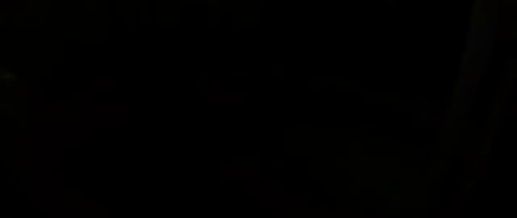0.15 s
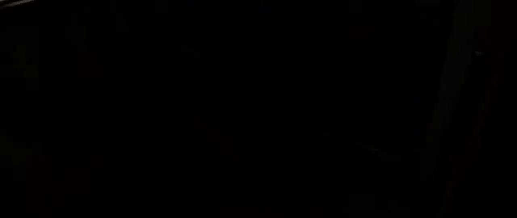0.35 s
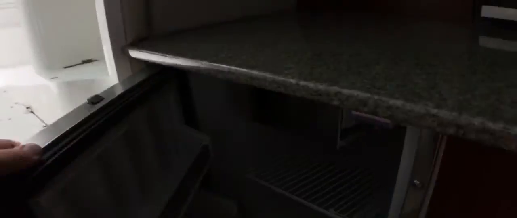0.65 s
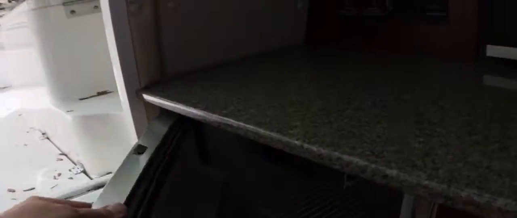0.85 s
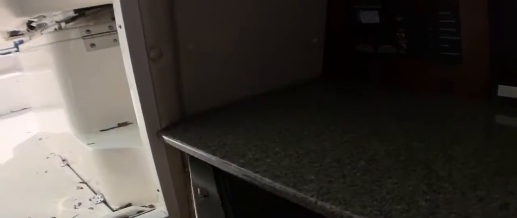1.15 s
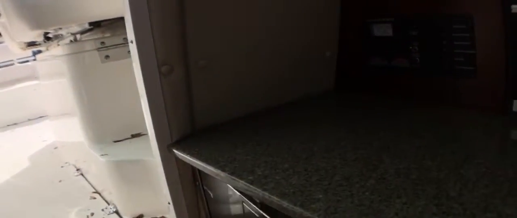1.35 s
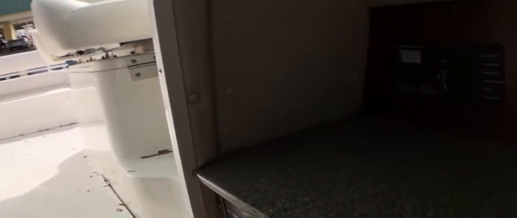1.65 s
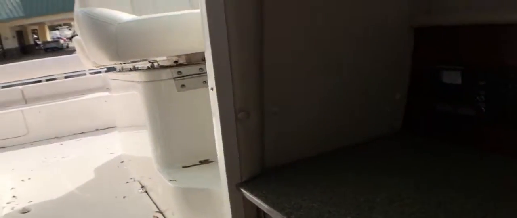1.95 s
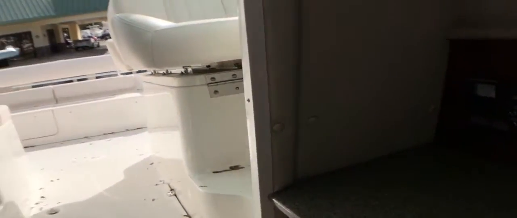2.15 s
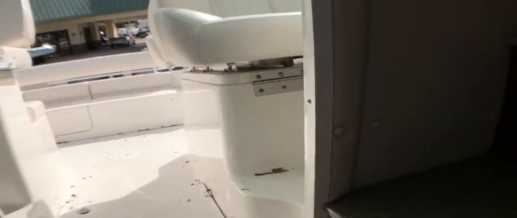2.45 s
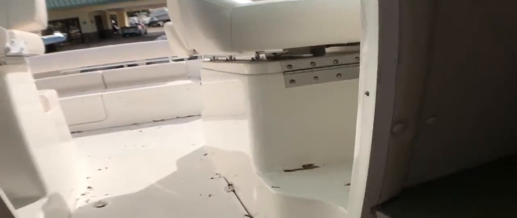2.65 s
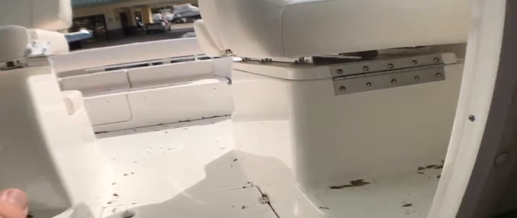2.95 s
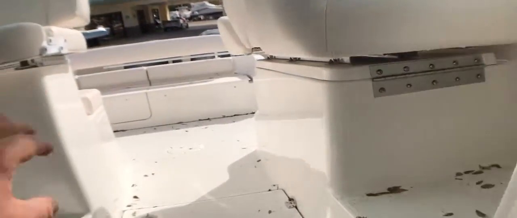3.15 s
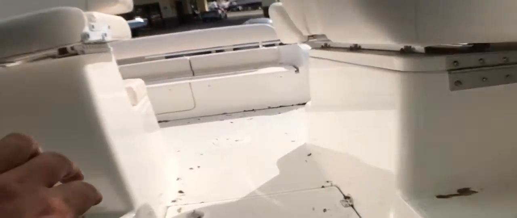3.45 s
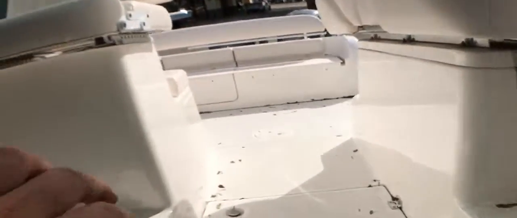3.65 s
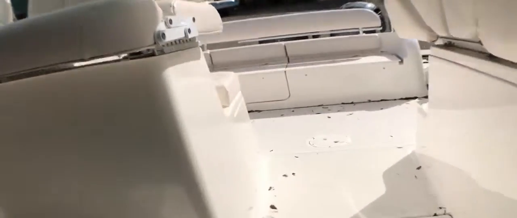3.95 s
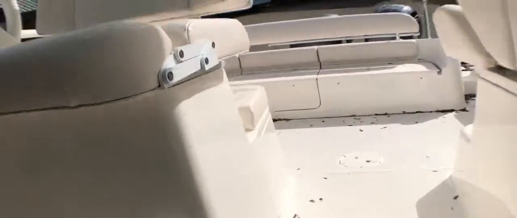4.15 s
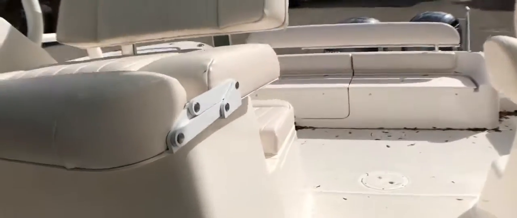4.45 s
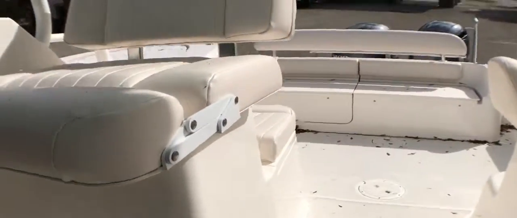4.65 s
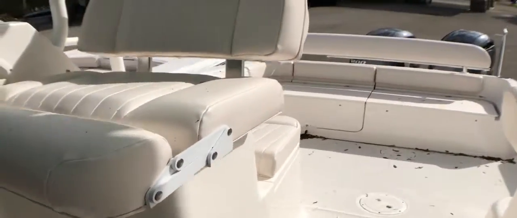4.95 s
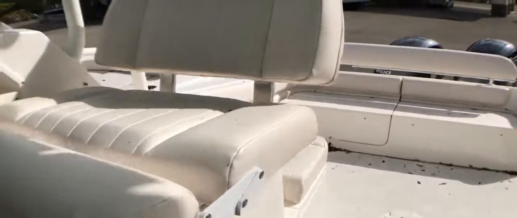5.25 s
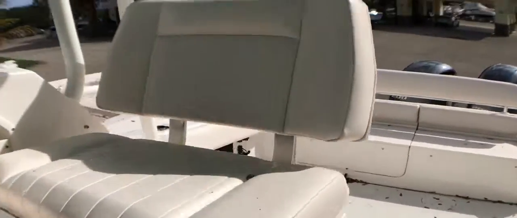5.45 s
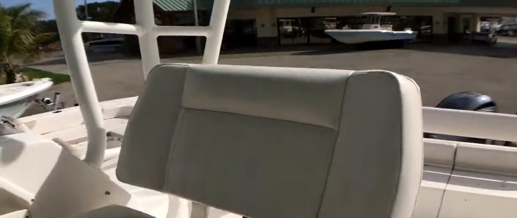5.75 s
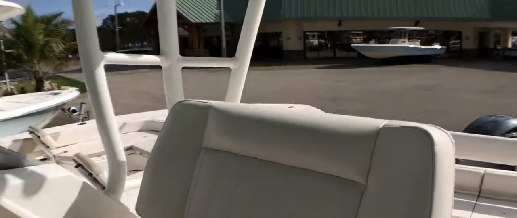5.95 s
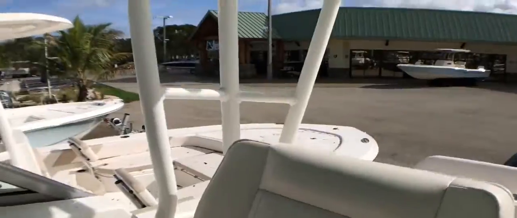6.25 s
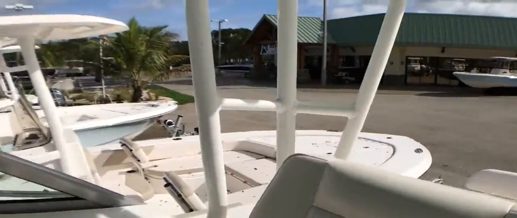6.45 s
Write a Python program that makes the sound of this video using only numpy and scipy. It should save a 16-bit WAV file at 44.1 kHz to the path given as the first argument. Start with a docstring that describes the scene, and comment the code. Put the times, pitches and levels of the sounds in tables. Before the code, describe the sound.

A handheld microphone moves from an enclosed boat cabin to its open deck. Dull, distant road rumble is cut by one loud cupboard slam with a bright latch click and boomy thud. After light cloth or shoe rubs, a strong double knock sounds on the hollow shell, then lighter taps, a sharp gritty scuff with a crack, and thumping steps, while the traffic rumble and airy roar become clearly louder.

```python
"""Cabin slam and steps on deck

Inside a small fibreglass boat cabin a cupboard door with a metal latch slams shut; then someone climbs out
on deck, shoes knocking and scuffing on the hollow shell, while road rumble and roar grow through the open
doorway. Panels, latch and hull are sums of dying sines; road, scuffs and cracks are shaped noise."""
import sys
import numpy as np
from scipy import signal
from scipy.fft import rfft, irfft
from scipy.io import wavfile
from scipy.ndimage import uniform_filter1d

SR = 44100
rng = np.random.default_rng(int(sys.argv[2]) if len(sys.argv) > 2 else 0)


def invert_db(level):
    """Linear amplitude ratio for a level in decibels (20 dB per decade), elementwise."""
    return 10 ** (np.asarray(level, dtype=float) / 20)


def persist_wave(psi):
    """Save psi, clipped to +-1, as 16-bit WAV."""
    counts = np.round(np.clip(psi, -1, 1) * 32767).astype(np.int16)
    wavfile.write(sys.argv[1], SR, np.atleast_2d(counts).T)


N = 291501  # samples

# balance of road colour over time, mostly rising: time_s, open_air_share (0-1)
OPEN_AIR = [(0, 0.15), (1.4, 0.25), (2.3, 0.36), (2.55, 0.24), (3.0, 0.42), (3.35, 0.41), (3.7, 0.34),
            (4.1, 0.64), (5.0, 0.78), (5.9, 0.86), (6.61, 1)]
# heavy low thumps of the hull: start_s, peak_db, settled_pitch_hz, t60_s
HULL_THUMPS = [(1.483, -24, 78, 0.12), (1.515, -5, 51.5, 0.063), (1.526, -14.5, 51, 0.058),
               (1.563, -15, 42.3, 0.11), (1.604, -39, 65.5, 0.11), (1.648, -25.5, 35, 0.21),
               (3.339, -24.5, 37.5, 0.86), (3.602, -16.5, 55, 0.23), (4.214, -21.5, 56, 0.21),
               (5.154, -18.5, 59.4, 0.1), (5.391, -16.5, 52.4, 0.18), (5.759, -22, 68.4, 0.15),
               (6.117, -28, 47.8, 1), (6.53, -15.5, 66.6, 0.17)]


def evened(x):
    """Scales to rms 1."""
    return x / np.sqrt(np.mean(x ** 2) + 1e-20)


def read(points, hz):
    """Reads a spectrum on a log-frequency axis."""
    f, value = np.transpose(points)
    return np.interp(np.log(hz + 1), np.log(f + 1), value)


def open_air_share(t):
    """Share of the open-air road colour at time t, 0-1."""
    return np.interp(t, *np.transpose(OPEN_AIR))


def add(mix, start_s, sound):
    """Mixes a sound in at start_s."""
    part = mix[round(start_s * SR):][:len(sound)]
    part += sound[:len(part)]


def noise(field_db, size):
    """Random short-time spectra under a level field over (Hz, s)."""
    hz = np.fft.rfftfreq(size, 1 / SR)
    t = np.arange(4 * N // size + 5) * size / 4 / SR
    real, imag = rng.standard_normal((len(t), len(hz), 2)).T
    spectra = (real + 1j * imag) * invert_db(field_db(hz[:, None], t))
    return signal.istft(spectra, nperseg=size, noverlap=3 * size // 4)[1][:N]


def rings(modes, weights, seconds, stiffen=0):
    """Sum of dying sines; a hard blow stiffens the panel, so the pitch starts high and drops."""
    hz, db, t60_s = np.transpose(modes)[:, :, None]
    t = np.arange(round(seconds * SR)) / SR
    bent_t = t + stiffen * 0.01096 * (1 - np.exp(-t / 0.0094))
    return (weights * invert_db(db - 60 * t / t60_s) * np.sin(2 * np.pi * hz * bent_t)).sum(0)


def road():
    """Road roar: noise opening from the cabin's colour to the open air's, with random patches."""
    # road noise deep in the cabin and out on deck: pitch_hz, relative_level_db (per Hz)
    inside = [(76, -36), (130, 2), (172, -20), (224, 5), (274, -12.5), (349, -4), (501, -9.5), (625, -10),
              (765, -9), (846, -8), (1060, -12), (1170, -11.5), (1580, -16), (1860, -18.5), (16000, -39.5)]
    outside = [(76, -50), (130, -9), (179, 1.5), (285, -7), (453, -14.5), (613, -8), (796, -6),
               (1080, -8.5), (2830, -25), (3530, -26), (4880, -35), (6210, -33.5), (10500, -41),
               (13600, -45), (16000, -49)]
    inside_db, outside_db, patch_db = -46.5, -32.5, 1.0

    def per_hz(points, total_db, hz):
        shape = read(points, hz)
        return shape + total_db - 10 * np.log10(np.sum(invert_db(2 * shape)))

    def field_db(hz, t):
        out = open_air_share(t)
        patches = rng.standard_normal((len(t), len(hz)))
        patches = uniform_filter1d(uniform_filter1d(patches, 14, 0), 12, 1)
        colour = (1 - out) * per_hz(inside, inside_db, hz) + out * per_hz(outside, outside_db, hz)
        return colour + patch_db * evened(patches).T

    return noise(field_db, size=1024)


def rumble():
    """Low road rumble in the hull, louder on deck, wavering, and stirred up by every thump."""
    # rumble spectrum: pitch_hz, relative_level_db (per Hz)
    spectrum = [(8.8, -39), (15, -14.5), (38, 4.5), (80, 1.5), (120, -0.5), (140, -11.5), (172, -56),
                (200, -19), (260, -19), (440, -120)]
    # slow swells and dips of the rumble: time_s, level_change_db
    swells = [(0, 0.5), (.25, -3), (.55, 1), (1.2, 1), (2.1, 0.5), (2.8, 1.5), (3.3, 1.5), (3.9, -0.5),
              (4.8, 0.5), (5.6, 0), (6.61, 0)]
    cabin_db, deck_db, waver_db = -41.5, -31, 3
    cabin_tilt_db = -2  # per octave: the cabin deepens the rumble
    shudder_db, shudder_rise_s, shudder_t60_s = -15.5, 0.015, 0.92  # level relative to the thump

    t = np.arange(0, N / SR + .02, .01)
    waver = evened(uniform_filter1d(rng.standard_normal(len(t)), size=30))
    level_db = cabin_db + (deck_db - cabin_db) * open_air_share(t)
    level_db = level_db + waver_db * waver + np.interp(t, *np.transpose(swells))
    power = invert_db(2 * level_db)
    for start_s, db, _, _ in HULL_THUMPS:
        after = np.maximum(t - start_s, 0)
        rise = 1 - np.exp(-after / shudder_rise_s)
        power = power + (rise * invert_db(db + shudder_db - 60 * after / shudder_t60_s)) ** 2

    def field_db(hz, t):
        octaves = np.log2(np.clip(hz, 20, 200) / 55)
        return read(spectrum, hz) + cabin_tilt_db * (1 - open_air_share(t)) * octaves

    steady = evened(noise(field_db, size=4096))
    return steady * np.interp(np.arange(N) / SR, t, np.sqrt(power))


def cracks():
    """Hard contacts: a snap of a few ms, then a diffuse tail coloured by resonances of the hard walls."""
    # start_s, snap_db, snap_hz, tail_db, tail_t60_s
    hits = [(0.268, -39, 1260, -38, 0.3), (1.4692, -24, 2900, -24.5, 0.17), (1.470, -34, 14000, -35, 0.32),
            (1.512, -9, 3900, -16.5, 0.14), (1.657, -28, 7000, -31, 0.15), (2.655, -46, 6000, -50, .1),
            (2.666, -33, 4000, -41, 0.14), (3.517, -36.5, 5500, -40, 0.088),
            (3.5195, -36, 1400, -32.5, 0.17), (3.563, -17.5, 1740, -22.5, 0.1),
            (3.6964, -62, 5000, -67, 0.037), (3.75, -51, 5000, -63, 0.064), (3.7863, -47, 5930, -50, .05),
            (3.899, -43.5, 2800, -60, .08), (5.079, -37, 13000, -56, .06), (5.097, -32, 4200, -34, .05),
            (5.115, -38, 4500, -47, 0.051), (5.1314, -17, 4500, -30.5, 0.13),
            (5.1732, -24.5, 5550, -39, 0.14), (5.76, -46, 894, -26.5, 0.38)]
    tail_pitch = 0.72  # the tail is duller than its snap
    out, t = np.zeros(N), np.arange(8192) / SR
    hz = np.fft.rfftfreq(8192, 1 / SR)
    for start_s, snap_db, snap_hz, tail_db, t60_s in hits:
        x, y = hz / snap_hz, hz / (tail_pitch * snap_hz)
        white = rng.standard_normal((2, 8192))
        lumps = rng.standard_normal(len(hz))
        resonances = invert_db(2.5 * evened(uniform_filter1d(lumps, 50)))
        snap_colour = x ** 2 / (1 + x ** 4.44)
        tail_colour = resonances * y ** 0.55 / (1 + y ** 2.7)
        snap, tail = irfft(rfft(white) * [snap_colour, tail_colour])
        snap = evened(snap) * np.exp(-t / .002) * (1 - np.exp(-t / .0003))
        tail = evened(tail) * invert_db(tail_db - 60 * t / t60_s) * (1 - np.exp(-t * 500))
        add(out, start_s, invert_db(snap_db) * snap + tail)
    return out


def latch():
    """Each click builds up over a short rattle; loose parts jangle every mode until a contact stops them."""
    # latch clicks: start_s, level_db, best_struck_hz, spread_octaves, stopped_after_s
    clicks = [(1.469, -25.5, 5400, 0.16, 0.016), (1.483, -36, 11100, 0.42, 0.045),
              (1.544, -33, 5100, .25, .12), (1.547, -43, 9500, .1, .12), (1.66, -25.5, 9000, 1.5, .12)]
    # latch modes: pitch_hz
    mode_hz = [3117, 3682, 4260, 4380, 5333, 6090, 6245, 6730, 7150, 8360, 8592, 9430, 9588, 11390, 11900,
               12880, 13530, 13980, 14945, 15380]
    # for each latch mode: level_db, t60_s
    mode_ring = [(-21, 0.17), (-22, .1), (-4, 0.18), (-9, 0.2), (-4, 0.18), (2, 0.1), (-15, 0.22),
                 (-22, 0.12), (-11, .12), (-22, .12), (-5.5, 0.19), (-2, 0.12), (-7, 0.2), (2, 0.11),
                 (-26, .15), (-16, 0.21), (-20, 0.07), (-8, .06), (-6, 0.11), (-24, 0.19)]
    rattle_s, stop_s, jangle_db = 0.0069, .003, 3.5
    out, t = np.zeros(N), np.arange(round(.3 * SR)) / SR
    hz = np.array(mode_hz)[:, None]
    modes = np.hstack([hz, mode_ring])
    for start_s, db, best_hz, spread, stopped_s in clicks:
        share = np.exp(-(np.log2(hz / best_hz) / spread) ** 2) * rng.choice([-1, 1], hz.shape)
        wobble = uniform_filter1d(rng.standard_normal((len(hz), len(t))), 160)
        jangle = invert_db(jangle_db * evened(wobble))
        shape = (1 - np.exp(-t / rattle_s)) * np.exp(-np.maximum(t - stopped_s, 0) / stop_s)
        add(out, start_s, invert_db(db) * rings(modes, share * jangle, seconds=.3) * shape)
    return out


def knocks(modes, blows, stiffen, damping, damping_per_ms):
    """Panel blows: long contact dulls, place struck picks the modes, damping may grow with contact."""
    out, k = np.zeros(N), np.arange(1, len(modes) + 1)[:, None]
    rise = 1 - np.exp(-np.arange(SR // 2) / SR / 0.0016)  # the bending wave takes time to fill the panel
    for start_s, db, contact_ms, place, pitch in blows:
        pole = np.exp(-1000 / SR / max(contact_ms, .02) * np.pi)
        panel = np.array(modes) * [pitch, 1, 1 / max(damping + damping_per_ms * contact_ms, .3)]
        ring = rings(panel, np.sin(np.pi * k * place), seconds=.5, stiffen=stiffen * invert_db(db)) * rise
        dulled = signal.lfilter([(1 - pole) ** 2], [1, -2 * pole, pole * pole], ring)
        add(out, start_s, -invert_db(db) * dulled)
    return out


def door_slam():
    """The cupboard door meets its frame in a run of blows that ring its panel modes."""
    # door modes before each blow's pitch factor and damping: pitch_hz, relative_level_db, t60_s
    modes = [(98, 2.5, 0.13), (117, 5.5, 0.068), (201.6, -5.5, 0.24), (268, 5, 0.096), (372, -0.5, 0.12),
             (480, 0, 0.087), (540, -9, 0.076), (754, -15, 0.3), (1040, -7.5, 0.18), (1456, -12, 0.27),
             (1710, -17, 0.041), (2080, 3, 0.058), (3030, -20, .1), (3090, -5, 0.054)]
    # start_s, relative_level_db, contact_ms, place (0-1), pitch_factor
    slams = [(1.472, -22, 0.31, 0.081, 0.99), (1.486, -23, 0.22, 0.07, 1),
             (1.506, -22.5, 0.13, 0.187, 0.81), (1.512, -18, 0.051, 0.024, 1),
             (1.528, -19, 0.48, 0.096, 0.89), (1.567, -17, 1.9, 0.215, 1), (1.607, -23.5, 2.5, 0.256, 0.91)]
    return knocks(modes, slams, stiffen=0.36, damping=0.99, damping_per_ms=0)


def thumps():
    """The whole hull gives a few slow swings after the slam and the steps, the hardest starting sharp."""
    out, t = np.zeros(N), np.arange(SR // 2) / SR
    for start_s, db, hz, t60_s in HULL_THUMPS:
        rise = 1 - np.exp(-t / 0.0085)
        swing = -rings([(hz, 0, t60_s)], rise, seconds=.5, stiffen=1.3 * invert_db(db))
        add(out, start_s, invert_db(db) * swing / abs(swing).max())
    return out


def rubbing(strokes, rasp_db):
    """Bright noise in uneven slips, plus a rasp in three resonances, rasp_db above the plain rub."""
    # rub spectrum: pitch_hz, relative_level_db (per Hz)
    spectrum = [(500, -22), (1000, -21), (2000, -4), (3500, -5.5), (5000, -10.5), (8000, -11), (12500, -13),
                (16000, -17)]
    span_db = 30  # level climbed and lost in a stroke
    rasp_hz, rasp_hz_per_db = 3680, 34  # lowest resonance at -30 dB; it rises with pressure
    pole = np.exp(-np.pi * 650 / SR)
    out = np.zeros(N)
    for peak_s, rise_s, fall_s, peak_db, tilt_db in strokes:
        t = np.arange(-rise_s, fall_s, 1 / SR)
        db = peak_db - span_db * np.maximum(-t / rise_s, t / fall_s)
        white, slips, grains = rng.standard_normal((3, SR))[:, :len(t)]
        hz = np.fft.rfftfreq(len(t), 1 / SR)
        white = white * invert_db(1.5 * evened(uniform_filter1d(slips, 150)))
        colour_db = read(spectrum, hz) + tilt_db * np.log2((hz + 1) / 4000)
        rub = irfft(rfft(white) * invert_db(colour_db), len(t))
        grit = white * invert_db(5.5 * evened(uniform_filter1d(grains, 90)))
        angle = 2j * np.pi * np.cumsum(rasp_hz + rasp_hz_per_db * (db + 30)) / SR
        rasp = 0
        for ratio, share in [(1, 0.74), (1.25, 0.51), (1.6, .5)]:
            turn = np.exp(ratio * angle)
            shifted = np.roll(grit, round(999 * ratio))
            # shift the gliding resonance to 0 Hz, low-pass, shift back
            low = signal.lfilter([1], [1, -2 * pole, pole * pole], shifted / turn)
            rasp = rasp + share * (turn * low).real
        edge = np.clip(np.minimum(t + rise_s, fall_s - t) / 0.0058, 0, 1)
        both = evened(evened(rub) + invert_db(rasp_db) * evened(rasp))
        add(out, peak_s - rise_s, both * edge * invert_db(db))
    return out


def brushes():
    """Cloth or shoe brushing past: rubbing noise without rasp."""
    # peak_s, rise_s, fall_s, peak_db, tilt_db (per octave)
    strokes = [(2.275, 0.14, 0.2, -44, -4.5), (2.342, 0.078, 0.13, -45.5, -4.5),
               (2.669, .005, 0.078, -40, -2), (2.758, 0.014, 0.027, -44, -4.5),
               (2.854, 0.036, 0.051, -58, -1), (3.204, 0.17, .2, -59, 1), (4.95, 0.32, 0.26, -51, -0.5),
               (5.77, 0.034, .09, -41, -4)]
    return rubbing(strokes, rasp_db=-np.inf)


def footsteps():
    """Shoes knock on the hollow deck shell; a foot that rests longer damps its modes more."""
    # shell modes before each blow's pitch factor and damping: pitch_hz, relative_level_db, t60_s
    modes = [(124.6, -8.5, 0.27), (205.4, -2.5, 0.26), (270, -18, 0.12), (292.6, -7.5, 0.26),
             (368, -4.5, 0.13), (423, -13.5, 0.16), (562, -20, 0.052), (610, -43, 0.017), (772, -16, 0.11),
             (1030, -20, 0.041), (1210, -36, 0.066), (1465, -16, 0.067), (2040, -17.5, 0.1)]
    # start_s, relative_level_db, contact_ms, place (0-1), pitch_factor (of the panel underfoot)
    blows = [(2.601, -25.5, 2.1, 0.27, 0.89), (2.672, -23, 1.2, 0.14, 0.99), (3.52, -5, 1.77, 0.35, 0.74),
             (3.5618, -4.5, 0.48, .21, 0.94), (4.175, -22.5, 0.49, .08, 1.14),
             (4.186, -16, 0.72, 0.04, 1.14), (4.193, -25.5, 0.61, 0.06, 1.05),
             (5.252, -9, 1.84, 0.18, 0.75), (5.264, -15, 0.91, 0.28, 0.61), (5.369, -26, 0.72, .2, 1.25),
             (5.748, -15, 0.62, .48, 0.94), (5.780, -14, 0.38, 0.24, 0.88), (5.805, -10.5, 0.53, .5, 0.85),
             (5.83, -24.5, 0.57, 0.18, 1), (6.542, -17.5, 0.76, 0.03, 0.83)]
    return knocks(modes, blows, stiffen=0.917, damping=0.31, damping_per_ms=1.65)


def drags():
    """A sole dragged over grit: rubbing noise with a strong rasp."""
    # peak_s, rise_s, fall_s, peak_db, tilt_db (per octave)
    strokes = [(5.07, 0.14, .08, -42, 2), (5.116, 0.095, 0.031, -30.5, -.5),
               (5.135, .02, 0.044, -31.5, -4.5), (5.172, 0.012, 0.069, -49, 7),
               (5.53, 0.12, 0.18, -51, -6.5)]
    return rubbing(strokes, rasp_db=4)


def scene():
    """All sources at one microphone."""
    background = road() + rumble()
    contacts = cracks() + latch() + door_slam()
    body = thumps() + footsteps()
    rubs = brushes() + drags()
    return (background + contacts + body + rubs)[None]


def band_limit(x):
    """A steep low-pass at the top of the band."""
    return signal.sosfilt(signal.butter(12, 16980, fs=SR, output="sos"), x)


def record(dry):
    """Overall tone: a notch near 10.5 kHz and a steep cut-off near 17 kHz."""
    # tone: pitch_hz, gain_db
    tone = [(9000, -0.5), (10000, 1.5), (10500, -5.5), (11000, 1.5), (12000, 2), (15600, 3), (15900, -12),
            (16900, -22), (17100, -80)]
    gain = invert_db(read(tone, np.fft.rfftfreq(N, 1 / SR)))
    heard = irfft(rfft(dry) * gain, N)
    return band_limit(heard)


dry = scene()
out = record(dry)
persist_wave(out)
```